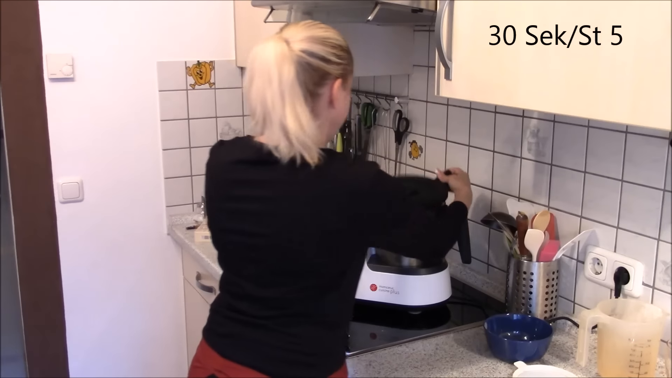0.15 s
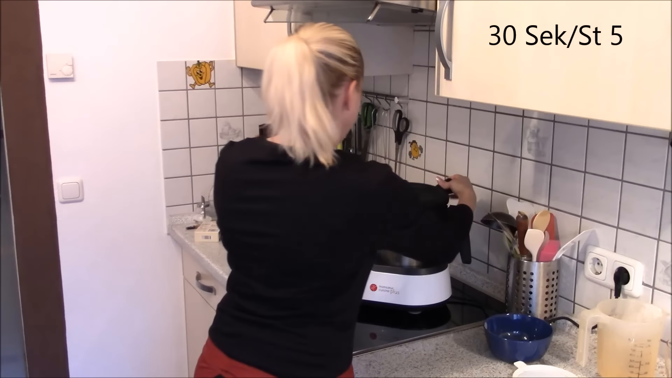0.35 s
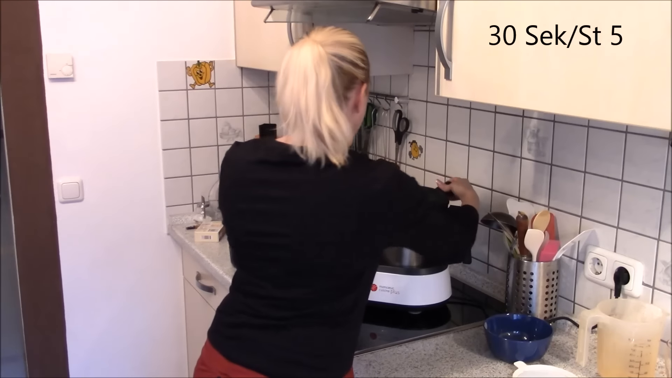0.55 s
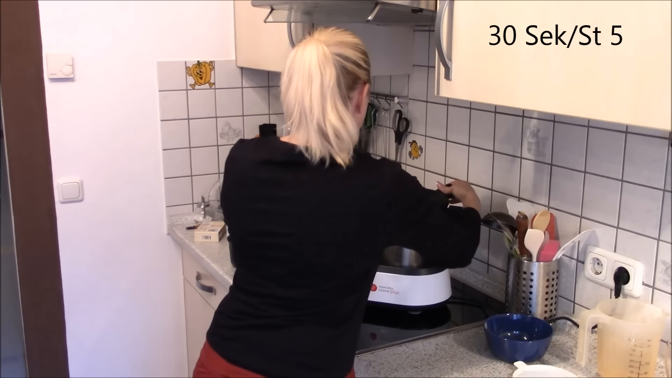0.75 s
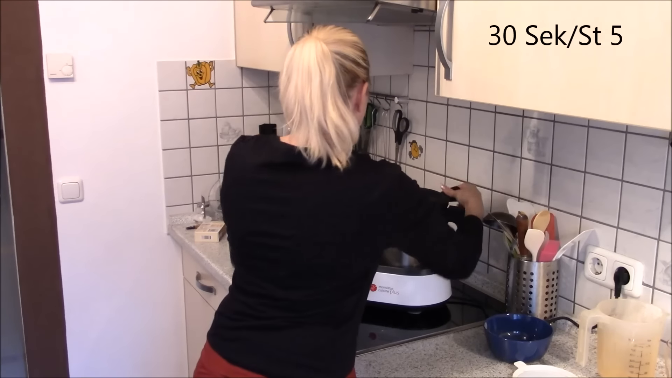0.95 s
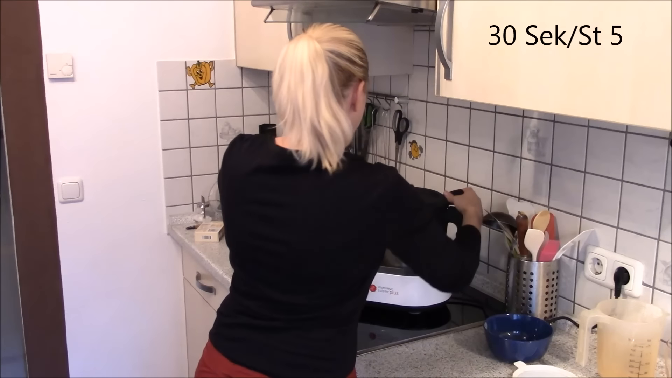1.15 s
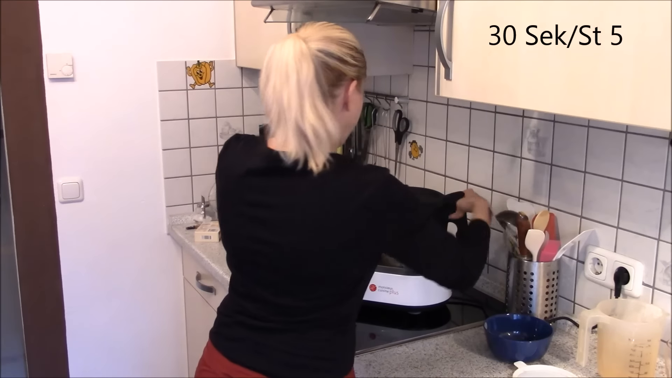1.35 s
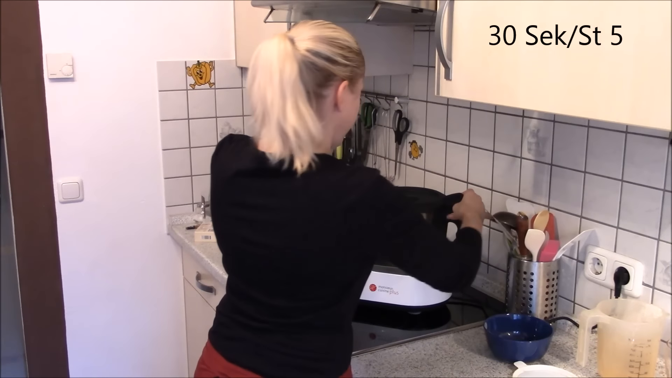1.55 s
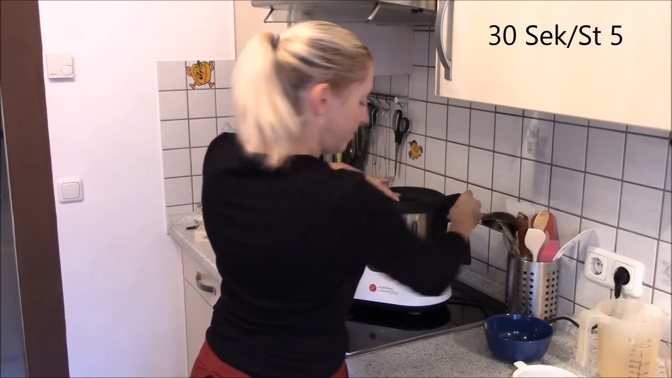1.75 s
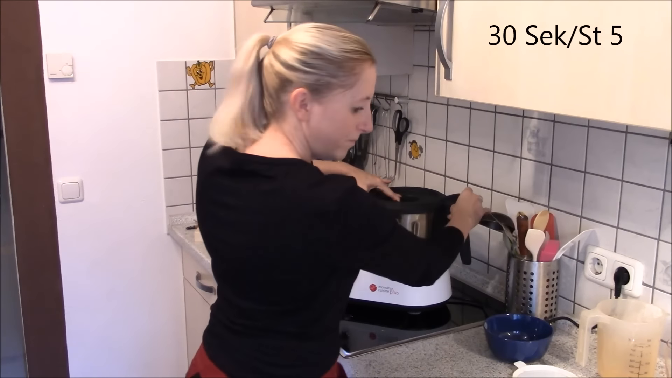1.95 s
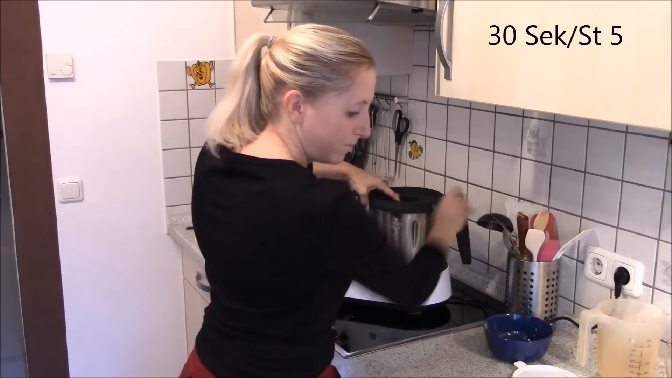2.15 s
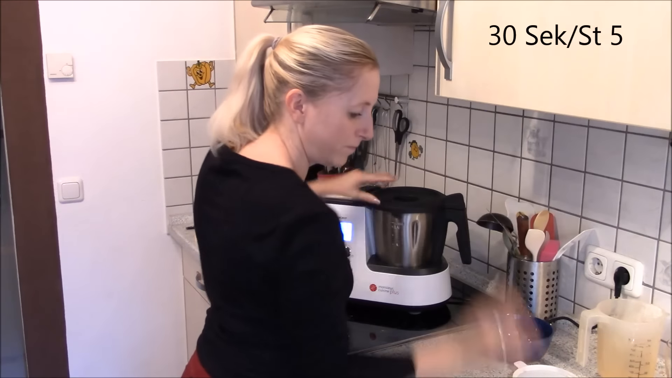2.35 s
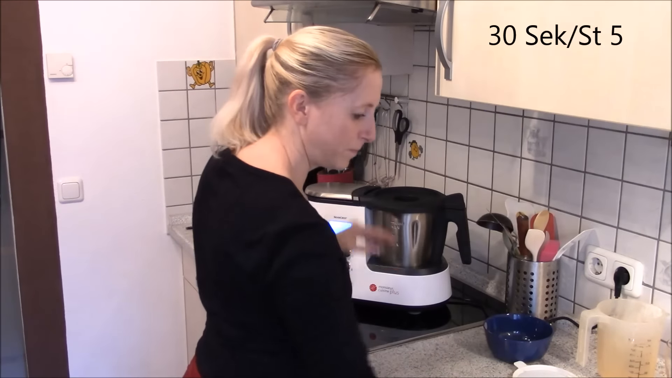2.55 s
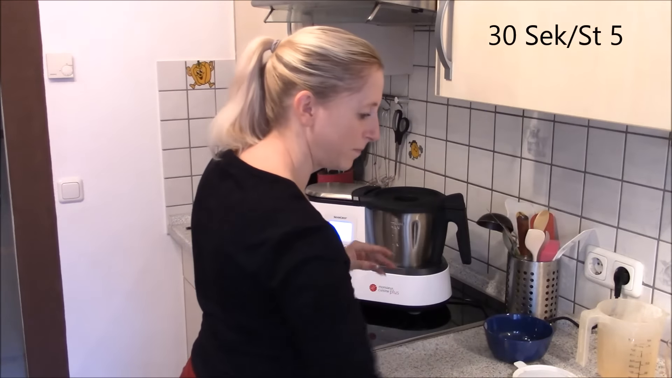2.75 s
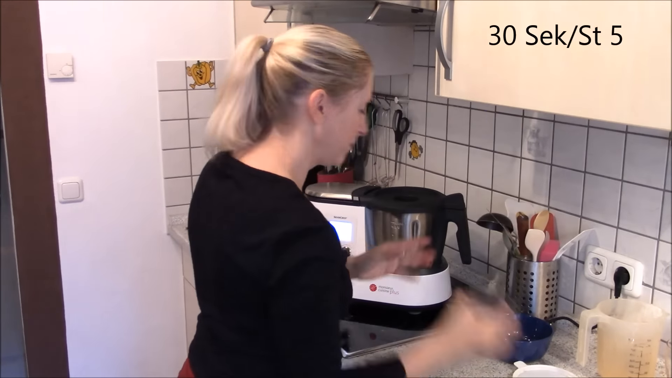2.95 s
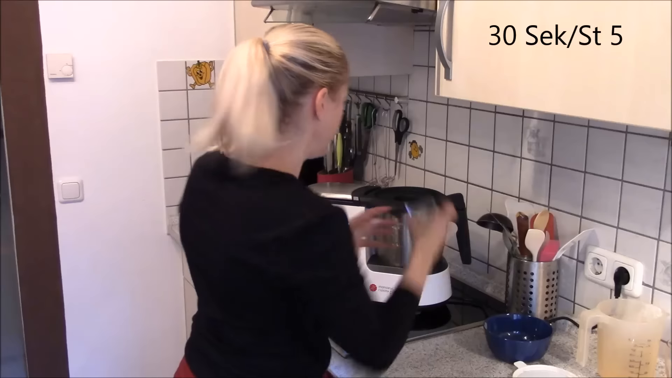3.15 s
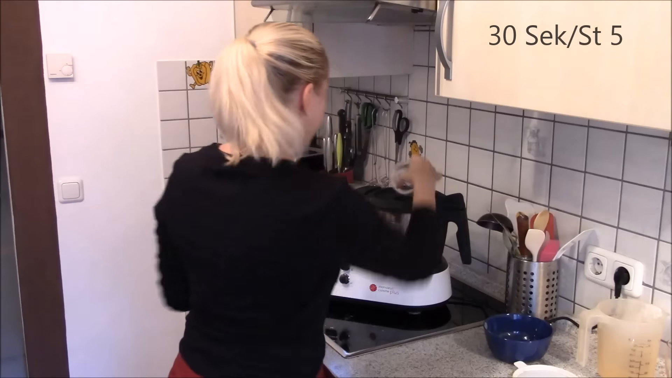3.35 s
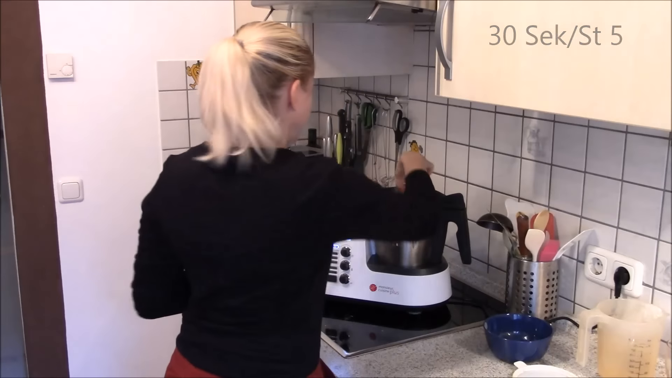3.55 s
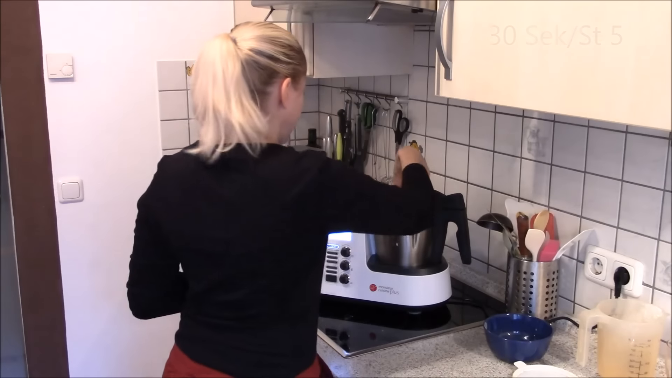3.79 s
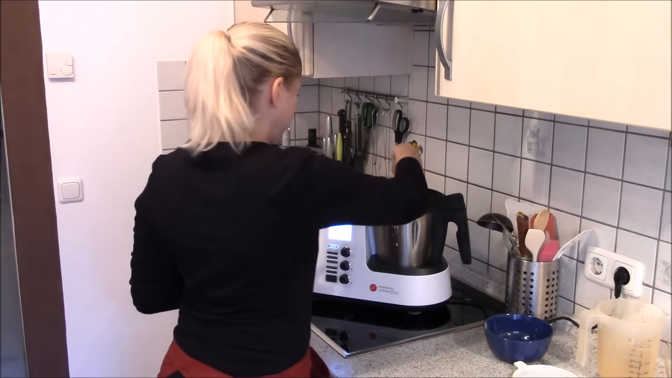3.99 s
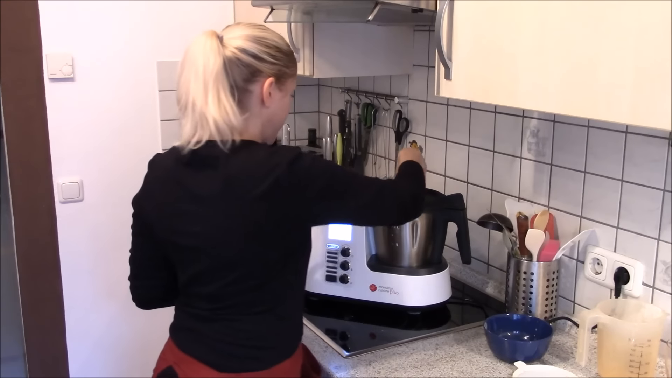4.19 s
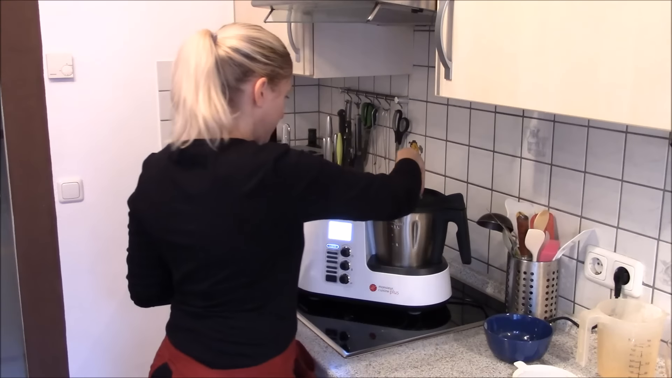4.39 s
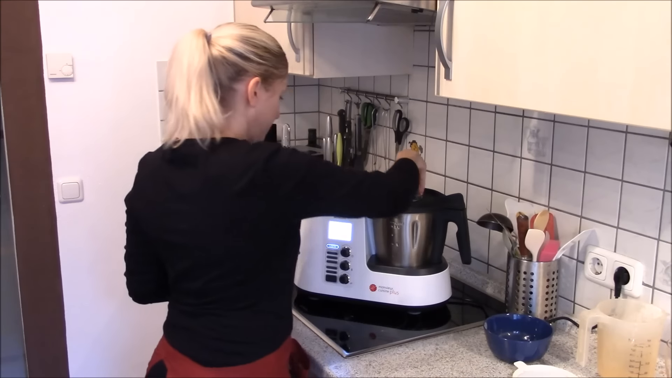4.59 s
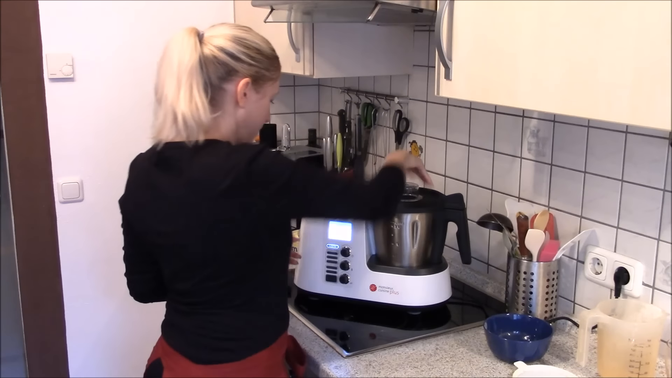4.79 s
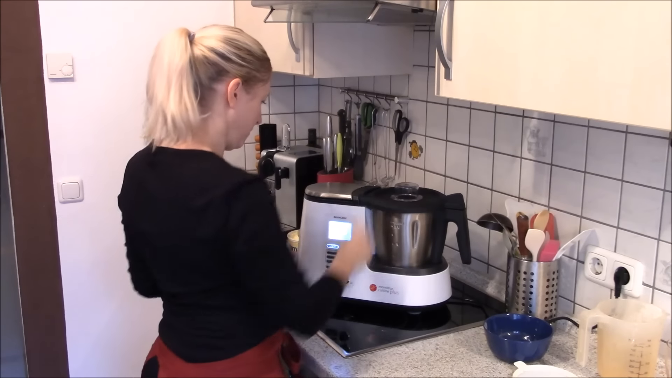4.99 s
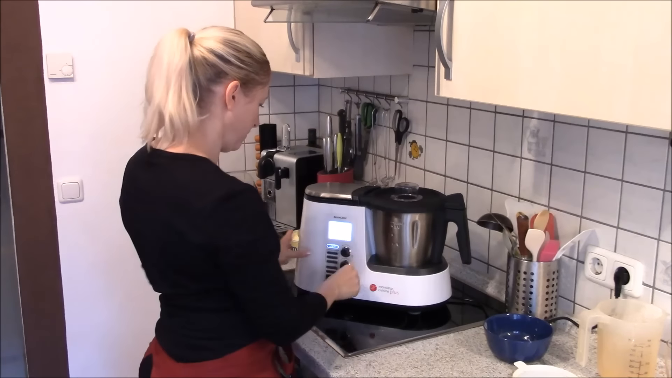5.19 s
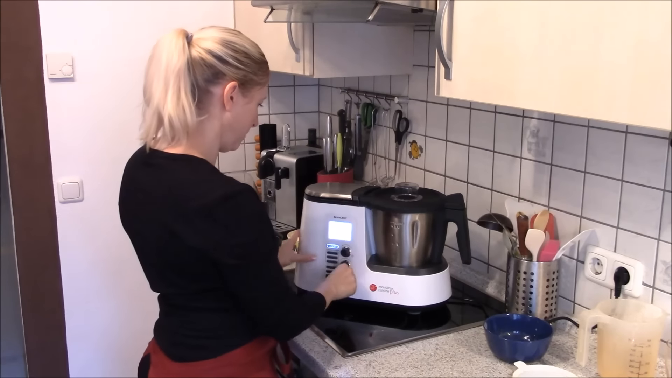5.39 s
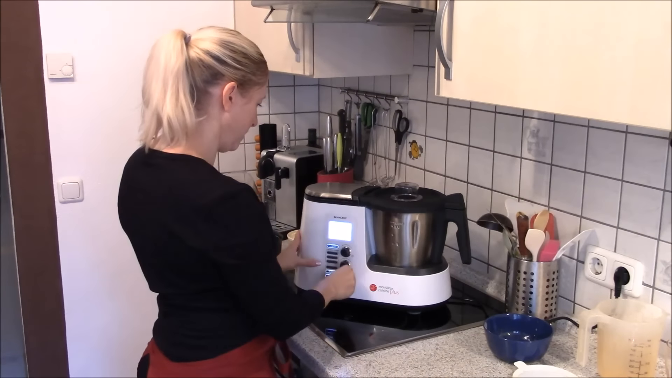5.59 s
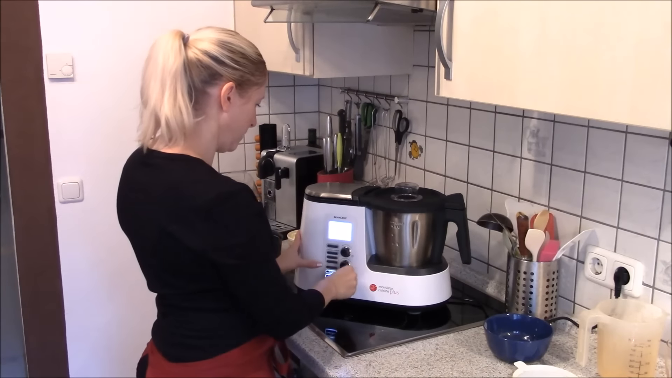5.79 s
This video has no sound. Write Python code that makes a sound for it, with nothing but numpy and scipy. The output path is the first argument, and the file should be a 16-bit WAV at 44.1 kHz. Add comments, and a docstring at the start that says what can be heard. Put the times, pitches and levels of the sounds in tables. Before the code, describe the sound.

A small tiled kitchen, heard in stereo from a camera a few metres away, with steady soft room noise and a barely audible wavering low hum. At the very start a plastic lid strikes a steel bowl on a hollow machine base, with thuds and rattles until about 0.25 s, then weak taps up to 0.75 s. From 0.9 s short uneven scrapes make the steel sing, mixed with a sharp crack at 1.3 s and hollow bumps and a bright snap at 1.45-1.6 s. A last scrape leads into the loudest sound, a hard locking clack at 1.95 s, then a small slide at 2.1 s. A very faint hand brush follows around 2.6 s, with tiny finger ticks until 3.4 s. From 3.5 s a small plastic cup knocks quickly into the lid, strongest and rattling at 4.1 s, with lighter clatters until 4.65 s. Faint taps near 5 s end it; quiet room noise remains.

```python
"""A plastic lid is knocked, slid and locked onto a steel mixing bowl, then a small plastic cup is seated in it.
Each blow thuds in the hollow machine base, rings the plastic and cracks on the rim: noise through resonances.
Sliding is uneven friction noise that sings in the steel; faint finger ticks and thin bright snaps fall between.
A tiled kitchen answers every contact with a dense echo, over a faint wavering hum and flickering room noise.
The microphone is a camera's, a few metres away, in stereo."""
import sys
import numpy as np
from scipy import signal
from scipy.fft import rfft, irfft, next_fast_len
from scipy.io import wavfile
from scipy.ndimage import uniform_filter1d

SR = 44100
rng = np.random.default_rng(int(sys.argv[2]) if len(sys.argv) > 2 else 0)


def dump(signal):
    """Clip the signal to [-1, 1] and save it as 16-bit WAV at the path in sys.argv[1]."""
    limited = np.clip(np.atleast_2d(signal).T, -1, 1)
    pcm = np.round(limited * 32767).astype(np.int16)
    wavfile.write(sys.argv[1], SR, pcm)


N = 257147
LEAD = 4096  # samples that run before time zero

# Resonances of the hollow machine base: centre_hz, width_hz, level_db (relative)
BASE_MODES = [(91.6, 25, -13.5), (179, 110, -15), (277, 50, 1), (309.7, 44, -1), (338.4, 42, 1.5),
              (423, 243, -2), (577, 146, 1), (730, 100, -8.5)]
# Resonance of the machine housing: centre_hz, width_hz, level_db (relative)
HOUSING_MODES = [(578, 12, 0)]
# Resonances of the lid's locking lugs: centre_hz, width_hz, level_db (relative)
LUG_MODES = [(2550, 1100, -2), (3000, 590, 0), (2960, 170, -1.5), (3850, 270, -4)]
# Resonances of the cup's lip: centre_hz, width_hz, level_db (relative)
LIP_MODES = [(2210, 290, -0.1), (2970, 640, 0.8), (3290, 2200, -4.3), (3555, 340, 0.12)]
# Resonances of the steel bowl when rubbed: centre_hz, width_hz, level_db (relative)
BOWL_MODES = [(2370, 50, -1), (2780, 50, -6), (3310, 80, -3), (3660, 50, -2), (5110, 50, -2),
              (5370, 45, -6), (5600, 40, -6), (6290, 60, 0), (6870, 70, -3), (7800, 45, -4), (8100, 70, -8),
              (8580, 60, -1), (9510, 45, -5), (10150, 60, -11), (10900, 60, -13), (11500, 60, -12),
              (12200, 50, -14), (13060, 55, -15), (13400, 90, -16), (14280, 70, -17), (15350, 60, -19)]

# Every tick and snap shares these pitches and this rattle decay
TICK_THUD_HZ, TICK_DOME_HZ, TICK_RATTLE_MS = 583, 1400, 4.3


def amp(db):
    """Amplitude ratio of a level in dB."""
    return 10 ** (np.asarray(db) / 20)


def unit(x):
    """Scale a signal or spectrum to an RMS of 1."""
    return x / np.sqrt(np.mean(np.abs(x) ** 2))


def on_log(table, hz):
    """A (Hz, value) table read on a log-frequency axis."""
    table_hz, value = np.transpose(table)
    return np.interp(np.log(np.maximum(hz, 1)), np.log(table_hz), value)


def peak(f, hz, width):
    """Response of one resonance, gain 1 at its centre."""
    return 1j * f * width / (hz ** 2 - f ** 2 + 1j * f * width)


def body(f, modes, db=0):
    """Sum of modes of alternating sign; db says how well this contact point drives each."""
    hz, width, top_db = np.transpose(modes)
    sign = (-1.) ** np.arange(len(hz))
    return (sign * amp(top_db + db)) @ peak(f, hz[:, None], width[:, None])


def walk(rate, count):
    """Random levels held 1 / rate s and slewed; spread near 1.3."""
    k = int(SR / rate)
    steps = np.repeat(rng.standard_normal(count // k + 1), k)
    return 1.59 * uniform_filter1d(steps, k)[:count]


def causal(magnitude):
    """The shortest response with a given magnitude spectrum, from its folded cepstrum."""
    cepstrum = irfft(np.log(magnitude + 1e-9))
    cepstrum[1:len(magnitude) - 1] *= 2
    cepstrum[len(magnitude):] = 0
    return np.exp(rfft(cepstrum))


def knocks(table, hollow, edge, steel_db, spread, edge_db, edge_share, crack_hz=5640):
    """Each blow, with a short rattle after it, drives the hollow below, the plastic dome, its edge and the rim."""
    # Resonances of the plastic dome: centre_hz, width_hz, level_db (relative)
    dome_modes = [(738, 76, 2), (1096, 240, -2.5), (1347, 374, -1.95), (1784, 270, -4.5)]
    struck_width = .4  # a struck bowl rings longer than a rubbed one: share of the mode widths
    struck_bowl = np.multiply(BOWL_MODES, [1, struck_width, 1])
    rattle_db, scatter_db = -6, 2
    edge_db_per_octave = 4  # a blow near the edge rings the dome higher and shakes the edge more
    size = 8192
    out, t = np.zeros(LEAD + N + size), np.arange(size) / SR
    f = np.arange(size // 2 + 1) * SR / size
    soft = 1 / (1 + 1j * f / 3500) ** 2  # plastic contact lasts too long to pass much treble
    for s, thud_db, dome_db, hard_db, thud_hz, dome_hz, rattle_ms in table:
        # the harder the contact, the more the crack and, in part, the edge stand out over the dome
        crack_db = dome_db + hard_db
        lugs_db = dome_db + edge_db + edge_share * hard_db + edge_db_per_octave * np.log2(dome_hz / 1000)
        rattle = rfft(rng.standard_normal(size) * np.exp(-1000 * t / max(rattle_ms, .5)))
        force = 1 + amp(rattle_db) * unit(rattle)
        # every blow lands elsewhere and drives the modes differently
        where = scatter_db * rng.standard_normal((4, 32))
        thud, dome, lugs, steel = (body(f, modes, db[:len(modes)]) for modes, db in
                                   zip((hollow, dome_modes, edge, struck_bowl), where))
        # the spot that is struck favours the modes near one pitch
        thud = thud * soft * (peak(f, thud_hz, 0.18 * thud_hz) + amp(-5.5)) / (1 + 1j * f / 800)
        dome = dome * soft * peak(f, dome_hz, 0.53 * dome_hz)
        # a harder crack on the rim rings the steel more
        ring = amp(steel_db + 0.64 * crack_db) * unit(steel)
        crack = peak(f, crack_hz, spread * crack_hz) ** 2 * (1 + ring)
        crack = crack / (1 + 1j * f / (5.9 * crack_hz)) ** 2
        # the parts radiate independently, so their powers add
        parts = (thud_db, thud), (dome_db, dome), (lugs_db, lugs * soft), (crack_db, crack)
        power = sum(np.abs(amp(db) * unit(h)) ** 2 for db, h in parts)
        blow = force * causal(np.sqrt(power))
        i = LEAD + int(s * SR)
        out[i:i + size] += irfft(blow, size) * amp(26.5)
    return out[:LEAD + N]


def lid_knocks():
    """The lid strikes the bowl and base, with the lugs shaken along its edge."""
    # Blows of the lid: start_s, thud_db, dome_db, crack_over_dome_db, thud_hz, dome_hz, rattle_ms (levels relative)
    blows = [(-.03, -15.5, -24, -2.5, 364, 1310, 9.5), (0.154, -14, -24.5, -8.5, 405, 1850, 2.7),
             (0.213, -16, -27, -14, 374, 1030, 11), (0.242, -40, -33, -16, 350, 1040, 4.6),
             (0.374, -47, -40.5, -6, 450, 910, 4), (0.561, -50, -49.5, -3.5, 355, 1650, 4),
             (0.636, -31.5, -44.5, -18.5, 265, 1123, 5.8), (0.676, -27, -40.5, -12.5, 315, 945, 4.8),
             (0.687, -31, -34.5, -11.5, 393, 1026, 4), (0.739, -41.5, -40, -12.5, 280, 1805, 3.4),
             (1.053, -33.5, -43.5, -18.5, 260, 813, 3), (1.272, -41, -35.5, -13, 325, 921, 1.8),
             (1.302, -28, -21.5, 6.5, 354, 1292, 6.4), (1.307, -40.5, -31.5, 18, 300, 1315, 12),
             (1.455, -16.5, -33, -20, 251, 1050, 11), (1.604, -18.5, -30.5, -13.5, 293, 784, 2.2)]
    return knocks(blows, BASE_MODES, LUG_MODES, steel_db=1, spread=0.98, edge_db=-2.0, edge_share=0.29)


def kitchen(dry):
    """Direct sound, strong echoes off the tiles nearby, then a dense tail that dies band by band; mid and side."""
    # Decay and strength of the kitchen's echo: centre_hz, t60_s, echo_db (relative)
    room_bands = [(61.4, 0.26, -5), (162, 0.41, 1), (350, 0.45, -6.5), (950, 0.48, -1), (3000, 0.53, -1),
                  (7000, 0.54, -2.5), (14100, 0.16, -2.5)]
    # Stereo width of the echo: centre_hz, side_minus_mid_db
    echo_side = [(40, -13), (90, -26.5), (350, -31), (700, -30), (1400, -22), (2800, -19), (6000, -13),
                 (10000, -16), (15000, -27)]
    direct_db = -11.5  # against the whole mid echo
    gap_ms, build_ms = 0.73, 1.6  # the first echoes arrive almost at once
    tiles_db, tiles_ms = 4, 14
    t = np.arange(int(.8 * SR)) / SR
    onset = 1 - np.exp(-np.maximum(1000 * t - gap_ms, 0) / build_ms)
    shape = onset * (1 + amp(tiles_db) * np.exp(-1000 * t / tiles_ms))
    f = np.arange(len(t) // 2 + 1) * SR / len(t)
    room_hz, t60, echo_db = np.transpose(room_bands)
    tail = 0
    for hz in 50 * 2 ** np.arange(0, 8.7, 1 / 3):
        band = irfft(rfft(rng.standard_normal((2, len(t)))) * peak(f, hz, hz / 3) ** 2, len(t))
        band = band * shape * np.exp(-np.log(1000) * t / on_log(np.c_[room_hz, t60], hz))
        # before its echo level, each band carries energy in proportion to its width
        band = band * np.sqrt(hz / np.sum(band ** 2, axis=1, keepdims=True))
        side_db = np.array([[0], [on_log(echo_side, hz)]])
        tail = tail + band * amp(on_log(np.c_[room_hz, echo_db], hz) + side_db)
    tail = tail / np.sqrt(np.sum(tail[0] ** 2))
    tail[0, 0] += amp(direct_db)
    return signal.fftconvolve(dry[None], tail, axes=1)[:, LEAD:LEAD + N]


def air():
    """Room and microphone noise whose bands flicker a little, and a wavering hum; mid and side."""
    # Spectrum of the room and microphone noise: centre_hz, density_db (relative, per Hz)
    air_spectrum = [(15, -47), (25, -21.5), (70, -12.5), (87, -10.5), (242, -3.5), (344, -1), (416, -2.5),
                    (451, -4), (560, -3), (714, -5), (1130, -9), (1700, -12.5), (1940, -14), (16000, -28)]
    # Stereo width of that noise: centre_hz, side_minus_mid_db
    air_side = [(60, -4), (110, -2.5), (200, -1), (380, -5.5), (700, -8.5), (1290, -9), (2380, -5.5),
                (4400, -9), (8120, -15), (15000, -5.5)]
    air_db, dull_hz = -56, 12500
    hum_hz, hum_width_hz, hum_db = 104.8, 6, -72.5
    flicker_scale_db, flicker_per_s = 1.2, 8  # nearly steady
    size = next_fast_len(N)
    f = np.arange(size // 2 + 1) * SR / size
    noise = rfft(rng.standard_normal((2, size))) * amp(on_log(air_spectrum, f)) / (1 + (f / dull_hz) ** 4)
    out = 0
    for hz in 30 * 2 ** np.arange(0, 9.6, .5):
        band = irfft(noise * np.abs(peak(f, hz, hz / 2)) ** 2, size)[:, :N]
        flicker = amp(flicker_scale_db * walk(flicker_per_s, N))
        out = out + band * flicker * amp([[0], [on_log(air_side, hz)]])
    # narrow-band noise is heard as a tone that wavers
    hum = rfft(rng.standard_normal(size)) * peak(f, hum_hz, hum_width_hz) ** 2
    hum = unit(irfft(hum, size)[:N])
    return out / np.std(out[0]) * amp(air_db) + amp(hum_db) * hum * [[1], [.1]]


def friction(table, steel_db, dull_hz=30000):
    """Uneven friction noise: a broad rub, and a few shifting contact spots that each excite other steel modes."""
    # Broad noise of sliding: centre_hz, density_db (relative, per Hz)
    rub_spectrum = [(150, -20.5), (300, 3.5), (1000, -2), (2500, -1.5), (4300, -7.5), (6500, -10),
                    (10000, -15.5), (16000, -29)]
    scatter_db, shift_db, spots = 3, 5, 3
    size = 32768
    out, f = np.zeros(LEAD + N), np.arange(size // 2 + 1) * SR / size
    ms = 1000 * np.arange(size) / SR
    rub = unit(amp(on_log(rub_spectrum, f)) / (1 + (f / dull_hz) ** 2))
    for s, rise_ms, hold_ms, fall_ms, db in table:
        # the pressure builds, holds, then dies away
        shape = np.minimum(ms / rise_ms, 1) ** 1.3 * np.exp(-np.maximum(ms - rise_ms - hold_ms, 0) / fall_ms)
        push = amp(db) * shape * amp(2.95 * walk(150, size))
        sound = rub * rfft(rng.standard_normal(size) * push)
        for _ in range(spots):
            steel = unit(body(f, BOWL_MODES, scatter_db * rng.standard_normal(len(BOWL_MODES))))
            spot = rng.standard_normal(size) * push * amp(shift_db * walk(25, size))
            sound = sound + amp(steel_db) * steel * rfft(spot) / np.sqrt(spots)
        i = LEAD + int(s * SR)
        out[i:i + size] += irfft(sound, size)
    return out


def lid_slides():
    """The lid slides on the rim, and friction sets the steel singing."""
    # Slides of the lid: start_s, rise_ms, hold_ms, fall_ms, level_db (relative)
    strokes = [(.893, 20, 2.3, 21, -33.5), (1.128, 34, 22, 30, -36), (1.31, 8, 25, 50, -29),
               (1.425, 16.6, 3, 54, -32.5), (1.6, 68, 10, 56, -30), (1.865, 12, 78, 4, -34),
               (2.125, 34, 9.7, 26, -37)]
    return friction(strokes, steel_db=-7)


def snaps():
    """Small catches snap thin and bright, mostly as a high crack."""
    # Snaps of small catches: start_s, housing_db, dome_db, crack_over_dome_db (levels relative)
    catches = [(1.55, -54, -35.5, 8.1), (2.778, -77, -71.5, 14.5), (3.465, -70, -59.5, 17.3),
               (3.599, -70, -63, 14.6)]
    blows = [(*row, TICK_THUD_HZ, TICK_DOME_HZ, TICK_RATTLE_MS) for row in catches]
    return knocks(blows, HOUSING_MODES, LIP_MODES, steel_db=-2.0, spread=0.7, edge_db=-2.5,
                  edge_share=0.26, crack_hz=8800)


def lid_lock():
    """The lid locks, mostly on its lugs."""
    # The locking blow: start_s, thud_db, dome_db, crack_over_dome_db, thud_hz, dome_hz, rattle_ms (levels relative)
    blow = [(1.952, -14, -8, -9.5, 287.5, 1450, 4.5)]
    return knocks(blow, BASE_MODES, LUG_MODES, steel_db=3, spread=1.0, edge_db=-0.5, edge_share=0)


def hand_brush():
    """A hand brushes the bowl: a duller rub that rings the steel less."""
    # The brush: start_s, rise_ms, hold_ms, fall_ms, level_db (relative)
    stroke = [(2.5, 123, 63, 61, -51)]
    return friction(stroke, steel_db=-16.5, dull_hz=1500)


def finger_ticks():
    """Fingers tick faintly on the housing and ring its one resonance."""
    # Finger ticks: start_s, housing_db, dome_db, crack_over_dome_db (levels relative)
    touches = [(2.706, -77.5, -63.5, 16.5), (3.18, -49.5, -62, 3.5), (3.273, -71.5, -67.5, 13),
               (3.355, -75, -67, 17.5), (4.99, -75.5, -52, -16), (5.175, -45, -62, -5.5)]
    blows = [(*row, TICK_THUD_HZ, TICK_DOME_HZ, TICK_RATTLE_MS) for row in touches]
    return knocks(blows, HOUSING_MODES, LIP_MODES, steel_db=-2.0, spread=0.49, edge_db=0.5, edge_share=.15)


def cup_knocks():
    """The cup is seated in the lid: its lip rings and the steel answers less."""
    # Blows of the cup: start_s, thud_db, dome_db, crack_over_dome_db, thud_hz, dome_hz, rattle_ms (levels relative)
    blows = [(3.506, -24, -24, -18.5, 290, 850, 2.2), (3.552, -17, -26, -18, 298, 1480, 3.4),
             (3.597, -20.5, -27.5, -15, 574, 1270, 1.2), (3.634, -29, -28.5, -51, 273, 930, 3.8),
             (3.778, -32, -42, -43, 341, 1430, 4.7), (3.834, -38, -40, -21.5, 290, 1030, 7.1),
             (3.989, -25.5, -26.5, -13.5, 320, 840, 1.1), (4.029, -29, -38.5, -6.5, 546, 1240, 2.4),
             (4.123, -18, -17, -20, 375, 1430, 32), (4.403, -50, -38, -15.5, 327, 1700, 3.5),
             (4.416, -31, -28, -17.5, 294, 1610, 19), (4.503, -38, -31, -15.5, 562, 806, 3.3),
             (4.52, -25.5, -26, -22, 463, 1630, 6.3), (4.633, -33, -37.5, -25, 592, 950, 5.9)]
    return knocks(blows, BASE_MODES, LIP_MODES, steel_db=-8, spread=0.47, edge_db=0.5, edge_share=.65)


def scene():
    """All contacts through the kitchen, over its noise, as left and right."""
    contacts = lid_knocks() + lid_slides() + snaps() + lid_lock()
    contacts = contacts + hand_brush() + finger_ticks() + cup_knocks()
    mid, side = kitchen(contacts) + air()
    return np.array([mid + side, mid - side])


def record(dry):
    """The camera rounds the loudest peaks and cuts the top."""
    top_hz = 15800
    rounded = np.tanh(dry)
    return signal.sosfilt(signal.ellip(8, .2, 70, top_hz, fs=SR, output="sos"), rounded)


dry = scene()
out = record(dry)
dump(out)
```